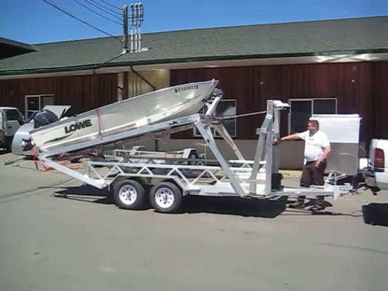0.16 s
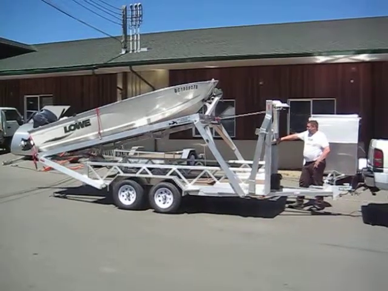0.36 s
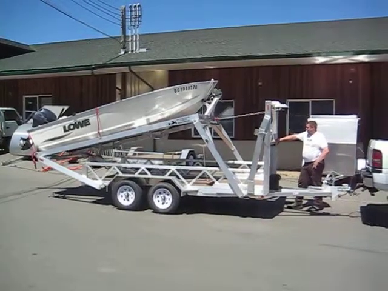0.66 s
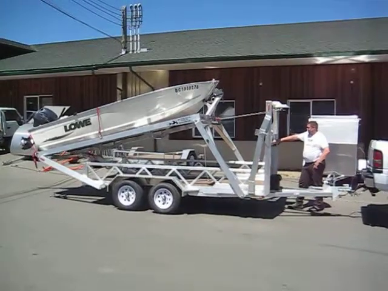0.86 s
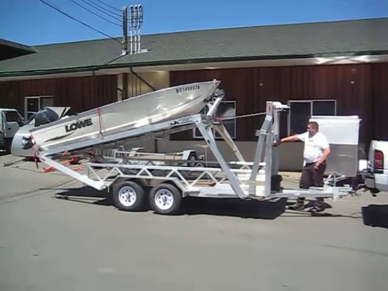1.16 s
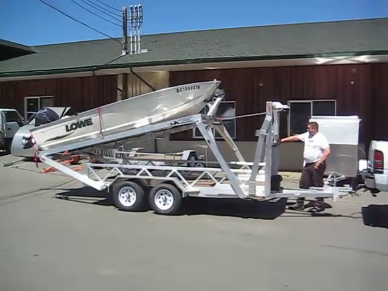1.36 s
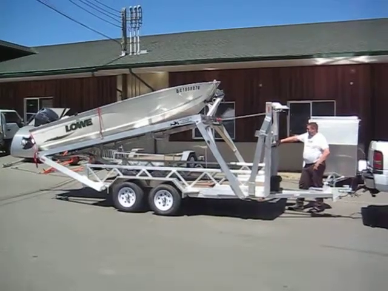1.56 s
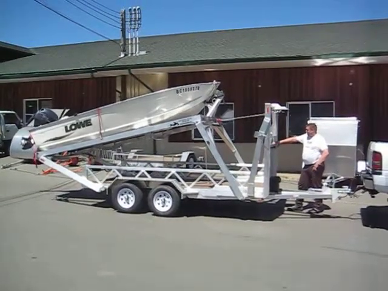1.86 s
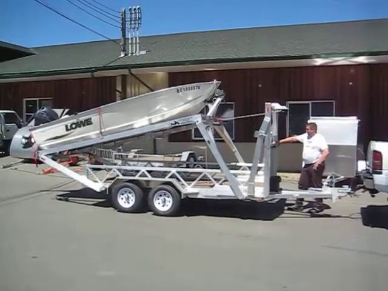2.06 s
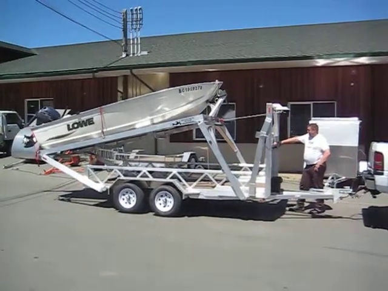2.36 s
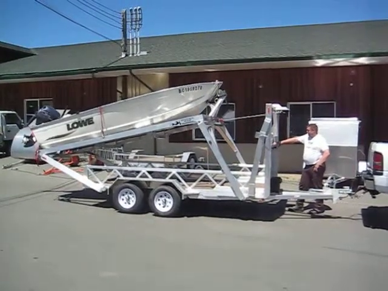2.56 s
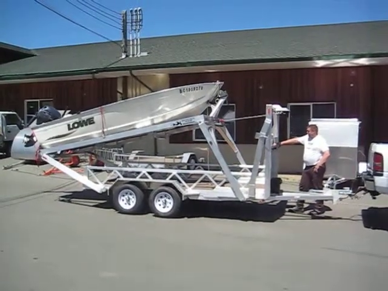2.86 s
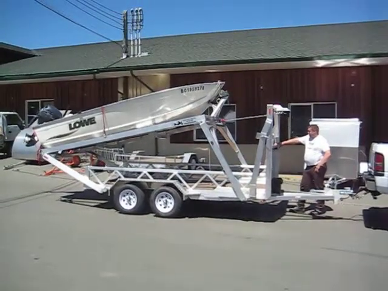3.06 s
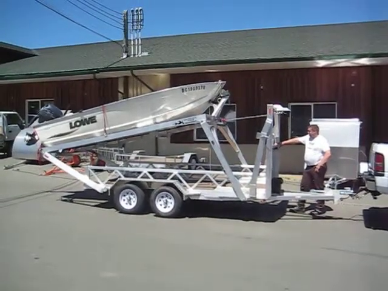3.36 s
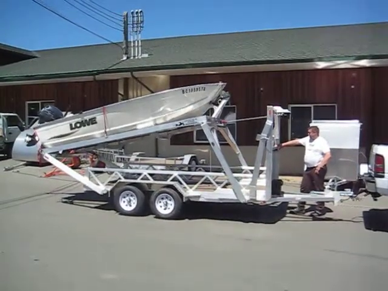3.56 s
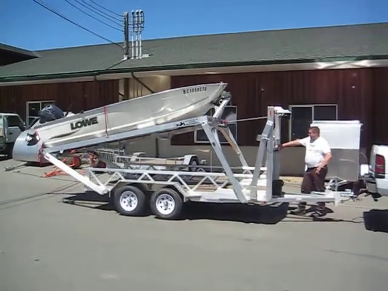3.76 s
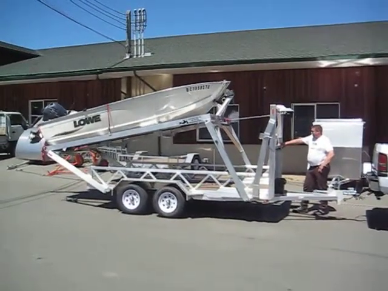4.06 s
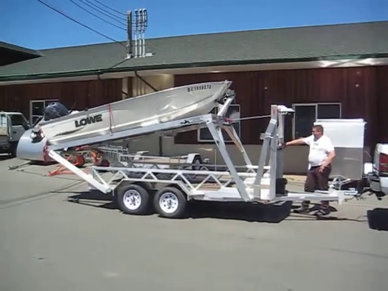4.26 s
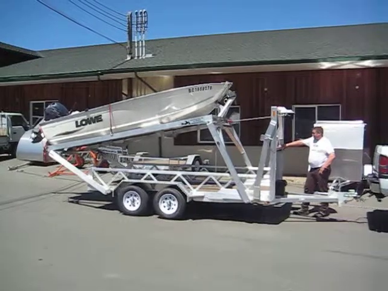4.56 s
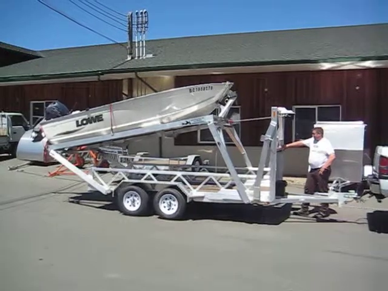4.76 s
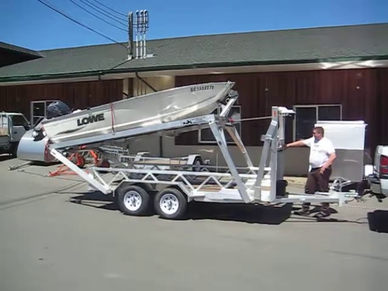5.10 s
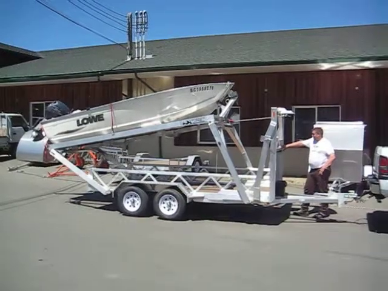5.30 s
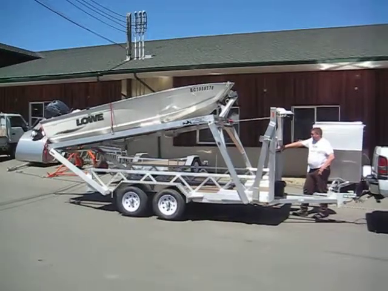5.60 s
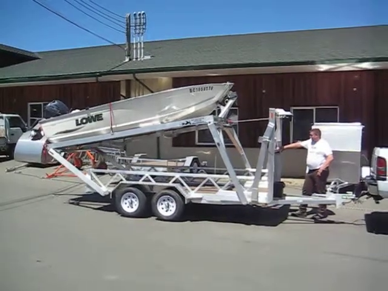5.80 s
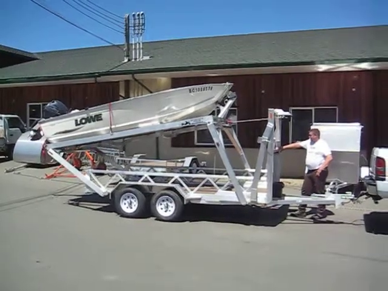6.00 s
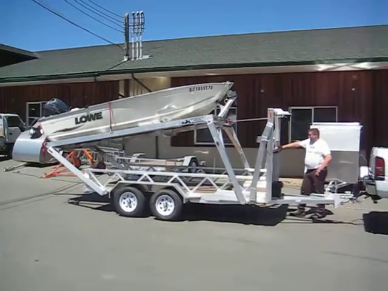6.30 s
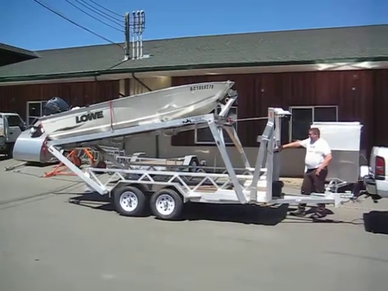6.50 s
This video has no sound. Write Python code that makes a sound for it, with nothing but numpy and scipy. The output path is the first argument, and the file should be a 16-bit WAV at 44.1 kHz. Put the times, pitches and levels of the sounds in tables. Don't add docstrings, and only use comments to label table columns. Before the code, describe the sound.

An electric winch runs continuously on a boat trailer in a paved yard, heard from several metres away on a small camera's microphone. A wavering, buzzy gear whine sits inside a loud, throbbing metallic rattle. The pitch dips slightly early on, recovers, then steps up after the middle and rises at the end. Brief scrapes, a sharp tick and soft handling thumps poke through above faint wind and distant traffic.

```python
import sys
import numpy as np
from scipy import signal
from scipy.fft import rfft, irfft
from scipy.io import wavfile
from scipy.ndimage import uniform_filter1d

SR = 44100
rng = np.random.default_rng(int(sys.argv[2]) if len(sys.argv) > 2 else 0)


def transcribe(u):
    v = np.clip(np.atleast_2d(u).T, -1, 1)
    q = np.round(v * 32767).astype(np.int16)
    wavfile.write(sys.argv[1], SR, q)


def level_to_linear(level):
    exponent = np.asarray(level, float) / 20
    return 10 ** exponent


N = 292824

# t/s, tooth rate f/Hz
SPEED = [(0.0, 383.4), (1.0, 384), (1.25, 380.3), (1.5, 374.6), (1.75, 377.9), (2.0, 382), (2.25, 385),
         (2.75, 383), (3.2, 383.3), (3.5, 381), (3.87, 384.4), (3.95, 392), (4.4, 397.9), (4.85, 394.4),
         (5.65, 392.5), (5.85, 396.9), (6.25, 405.3), (6.64, 407)]
TEETH = 48
CREEP = 1.006
MULTIPLES = (1, 2, 3, 4, 5, 6, 8, 9)
FOLLOWS = (1, 2, 3, 4, 5, 5, 5, 5)
# level over the one it follows/dB, blurred part level/dB, blur width/Hz
WHINE = [(1.4, -46, 33), (0.9, -35, 42), (-1.6, -43.5, 26), (-0.1, -39, 33), (1.54, -33.5, 40),
         (-5, -40, 61), (-5, -37.5, 58), (-10, -43, 73)]
MESH = [-44.5, -36, -42, -41.5, -34]
# f/Hz, width/Hz, lift/dB
MOUNT = [(381, 14.3, 10.5), (395.6, 3.2, 6.5), (407, 6.63, 8), (748, 10, 2), (787.4, 11, 9.5),
         (803, 52, 9.5), (1130, 10, 7.5), (1180, 16, 2), (1205, 33, 8.5), (1494, 20, 3.5), (1525, 28.7, 5),
         (1918, 60, 0.5), (1998, 4.7, 7), (2033, 20, 5)]
# t/s, level change/dB, length/s
EASES = [
    [(0.24, -2.5, 2.6), (6.33, -2.5, 0.63)],
    [(1.6, 4.5, 0.42), (4.2, -2.5, .15), (4.55, -3.5, 1), (5.95, 2.5, 0.33), (6.5, -3.5, .25)],
    [(.3, 8.5, 0.46), (4.6, -3.5, 0.67)],
    [(.6, 0, .5), (1.4, 6.5, 0.45), (6.4, -4, .7)],
    [(2.2, -0.5, 3.3), (4.45, 5, 0.53), (6.4, 0, 0.62)],
]
# throbs a turn, depth/dB, high spot/turns of that throb
TONE_THROB = [(1, 0, 0.45), (2, -1.5, 0.9), (3, .5, .75)]
WORN = [(.25, .55), (.33, .9)]
WORN_TURNS = .09
# first f/Hz, f gained per tooth rate/(Hz/Hz), drift/(Hz/s), first level/dB, drift/(dB/s)
CHATTER = [(2334, 4.5, 3, -30, -0.18), (3905, .1, 18, -28, -0.84), (4296, -.1, 11, -33, 0.35)]
# width/Hz, bead depth/dB, level offset/dB
BEADS = [(45, 1.5, -6.5), (103, 2, -0.5), (116, 0.5, -1.)]
# throbs a turn, depth/dB, high spot/turns of that throb
CHATTER_THROB = [(1, 2.1, 0.028), (2, 1.9, 1), (3, 3.5, 0.8)]
# t/s, level change/dB, length/s
FLARES = [
    [(.35, 5, .7), (1.5, -2, 0.87), (2.6, 3.5, 0.87), (4.4, 10, 0.69), (6.3, 6, .6)],
    [(0.4, 2.5, 0.66), (1.1, -1, .6), (4.7, 3.5, 0.63)],
    [(.6, -6, .5), (2.45, 3.5, 0.66), (5.0, 4.5, .7), (6.3, -18, 0.54)],
]
# throbs a turn, depth/dB, high spot/turns of that throb
RATTLE_THROB = [(1, 0.51, 0.021), (2, 0.22, 0.97), (3, 0.63, 0.78)]
SPLITS_HZ = (1750, 4560)
# worn share (0-1), throb factor, flutter/dB, knock spread/dB, share of the grating (0-1)
PARTS = [(0.48, 0.44, 1, 1.1, 0.72), (0.25, 0.38, 1, 1.45, 0.28), (0.11, 0.89, 0.79, 1.33, 0.56)]
# t/s, level over the usual scrape/dB, length/s
GRATES = [(.01, -3.5, 0.024), (.03, -1.5, 0.052), (.47, 1.5, 0.057), (.51, -9, .02), (.54, 3, 0.024),
          (.655, 8.5, 0.03), (1.05, 0, 0.14), (1.4, 6, 0.046), (1.5, -2, 0.048), (1.555, 6, 0.037),
          (3.05, 3, 0.072), (3.18, 4, 0.053), (3.44, 4, 0.06), (3.495, -6, 0.034), (3.54, 4.5, 0.088),
          (3.7, 4, 0.077), (4.5, -2.5, 0.2), (4.73, 1, 0.092), (5.51, 7, 0.02), (5.56, -5, 0.078),
          (6.32, 4, .04), (6.44, 1, 0.072), (6.47, -5, 0.031)]
# f/Hz, level per Hz/dB
RATTLE = [(230, -40.5), (340, -18), (468, -28.5), (515, -19), (800, -7), (990, -13.5), (1500, -12),
          (1800, -13.5), (1950, -6), (3000, -9.5), (4500, -14), (4900, -19.5), (9900, -35), (15230, -66.5)]
RATTLE_DB = -20.5
# f/Hz, width/Hz, level over the rattle/dB
CASING = [(305, 20, 4), (593, 18, 5), (640, 36, -10), (676, 14, 7.5), (880, 52, 4), (1150, 55, 4),
          (1503, 45, 5), (1592, 22, 5), (2034, 27, 3), (2114, 22, 3), (2156, 22, 5), (2311, 20, 8),
          (2500, 52, 3), (2649, 16, 6), (2750, 120, 2), (2897, 32, 3), (3040, 86, 4), (3526, 66, 7),
          (4440, 90, 3), (5250, 200, 2), (5604, 60, 8), (6710, 100, 2), (7558, 25, 8), (8500, 280, 3),
          (10050, 80, 2), (11000, 50, 4), (12400, 2200, 5), (13150, 200, 3)]
# f/Hz, level per Hz/dB
YARD = [(15, -24), (40, -14), (100, 0), (160, -6.5), (220, -1.5), (300, -4.5), (600, -9)]
YARD_DB = -51.5
# t/s, level over calm/dB, length/s
GUSTS = [
    (.1, 5, 0.27),
    (.36, 11, .2),
    (.55, 11, .14),
    (3.24, 13, 0.13),
    (3.52, 10, .25),
    (4.05, 7, 0.21),
    (4.5, 8.3, 0.73),
    (5.13, 12, .2),
    (6.3, 4.17, .5),
]
CALM_DB = -65
# t/s, low drone f/Hz, upper drone f/Hz
DRONES = [
    (0, 65.4, 134),
    (2.6, 63.9, 132),
    (5.6, 65.6, 130),
    (5.9, 74.4, 130),
    (6.64, 76, 130),
]
# t/s, level over usual/dB, length/s
SWELLS = [
    (0, 15, 0.13),
    (.42, 11, .18),
    (2.35, 1, .4),
    (3.52, 6, .25),
    (4.1, 11, 0.88),
    (5.01, 17, .15),
    (5.25, 14, 0.28),
    (5.65, -9, .12),
    (6.4, 9, 0.54),
]
LOW_DB, UPPER_DB, UPPER_FADE_DB = -65.5, -55.5, -1.7
# t/s, peak level/dB, f/Hz, length/s
THUMPS = [(.33, -44, 45, .05), (0.42, -39, 80, 0.028), (0.526, -43, 45, .04), (3.232, -50, 50, .04),
          (3.467, -36, 130.6, .022), (3.474, -36.5, 260, 0.023), (3.493, -42, 80, .03),
          (3.553, -32, 130, 0.01), (3.62, -44, 70, .04), (4.487, -42, 84.5, 0.045), (5.0, -42, 89.9, .03),
          (5.273, -34, 190.3, 0.012), (6.299, -37, 308, 0.05), (6.33, -37, 518, 0.06)]
# t/s, peak level/dB, ring f/Hz, t60/s
TICKS = [
    (.535, -23, 5700, 0.053),
    (1.398, -45, 6500, .03),
    (3.79, -40, 10480, .03),
    (5.711, -42, 10960, .09),
    (6.31, -39, 5430, .04),
]
# f/Hz, level/dB
WHISTLE = [(15090, -97), (15121, -87), (15150, -85), (15170, -97)]


def evened(x):
    return x / np.sqrt(np.mean(abs(x) ** 2) + 1e-20)


def columns(rows):
    s, *values = np.transpose(rows)
    return [np.interp(np.arange(N) / SR, s, v) for v in values]


def bumps(rows):
    t = np.arange(0, N + 64, 64) / SR
    db = sum(db * np.exp(-4 * ((t - s) / length) ** 2) for s, db, length in rows)
    return np.interp(np.arange(N) / SR, t, db)


def wander(width_hz):
    step, lead = 16, 4000
    z = rng.standard_normal((N // step + lead, 2)) @ [1, 1j]
    r = np.exp(-np.pi * width_hz * step / SR)
    smooth = signal.lfilter([1], [1, -2 * r, r * r], z)
    smooth = evened(smooth[lead // 2:])
    return np.interp(np.arange(N) / step, np.arange(len(smooth)), smooth)


def shaped(x, points, rings=()):
    hz = np.fft.rfftfreq(N, 1 / SR)
    f, db = np.transpose(points)
    gain = level_to_linear(np.interp(np.log(hz + 1), np.log(f + 1), db, -90, -90))
    lift = 1 + sum((level_to_linear(db) ** 2 - 1) / (1 + (2 * (hz - f) / w) ** 2) for f, w, db in rings)
    return evened(irfft(rfft(x) * gain * np.sqrt(np.maximum(lift, 0)), N))


def throb(turns, table, factor=0.75):
    return level_to_linear(factor * sum(db * np.cos(2 * np.pi * (k * turns + spot)) for k, db, spot in table))


def meshing(hz):
    grid = np.arange(300, 2200.)
    lift = 1 + sum((level_to_linear(db) ** 2 - 1) / (1 + (2 * (grid - f) / w) ** 2) ** 2 for f, w, db in MOUNT)
    lift_db = 10 * np.log10(lift)
    return {k: db + np.interp(k * hz, grid, lift_db) + bumps(rows)
            for k, db, rows in zip(MULTIPLES, MESH, EASES)}


def whine(teeth, levels_db):
    turns = CREEP * teeth / TEETH
    worn = []
    for place, depth in WORN:
        away = (turns - place + .5) % 1 - .5
        worn.append(1 - depth * np.exp(-(away / WORN_TURNS) ** 2))
    out = np.zeros(N)
    for k, leader, (db, blurred_db, blur_hz) in zip(MULTIPLES, FOLLOWS, WHINE):
        steady_power = level_to_linear(levels_db[leader] + db) ** 2 - level_to_linear(blurred_db) ** 2
        contact = np.sqrt(np.maximum(steady_power, 0)) + level_to_linear(blurred_db) * wander(blur_hz)
        if k <= len(WORN):
            wheel = throb(turns, TONE_THROB) * worn[k - 1]
        else:
            wheel = throb(teeth / TEETH, RATTLE_THROB)
        tone = np.exp(2j * np.pi * (k * teeth + rng.random()))
        out += np.sqrt(2) * wheel * (contact * tone).real
    return out


def chatter(teeth, speed):
    t = np.arange(N) / SR
    out = np.zeros(N)
    for band, (width_hz, bead_db, under_db), flares in zip(CHATTER, BEADS, FLARES):
        first_hz, follow, drift_hz, first_db, drift_db = band
        hz = first_hz + follow * (speed - speed[0]) + drift_hz * t
        beads = throb(teeth / TEETH, CHATTER_THROB) * level_to_linear(bead_db * wander(72).real)
        fuzzy = (wander(width_hz) * np.exp(2j * np.pi * np.cumsum(hz) / SR)).real
        level_db = first_db + drift_db * t + bumps(flares) + under_db
        out += level_to_linear(level_db) * evened(beads * fuzzy)
    return out


def panels(x, patchy_db=2.5):
    z = signal.stft(x, nperseg=2048, noverlap=1536)[2]
    patches = rng.standard_normal(z.shape[::-1]).T
    patches = evened(uniform_filter1d(patches, size=48, axis=1))
    patchy = signal.istft(z * level_to_linear(patchy_db * patches), nperseg=2048, noverlap=1536)[1]
    return evened(patchy[:N])


def rattle(teeth):
    marks = rng.standard_normal(TEETH * 128)
    repeat = marks[(teeth * 128).astype(int) % len(marks)]
    fresh = rng.standard_normal(N)
    scrape_db = bumps(GRATES)
    scrape_db = scrape_db - scrape_db.mean()
    part = np.searchsorted(SPLITS_HZ, np.fft.rfftfreq(N, 1 / SR))
    joined = 0
    for k, (worn, factor, flutter_db, knock_db, share) in enumerate(PARTS):
        surface = np.sqrt(1 - worn) * fresh + np.sqrt(worn) * repeat
        drive = surface * throb(teeth / TEETH, RATTLE_THROB, factor)
        shake_db = flutter_db * wander(16).real + knock_db * wander(190).real + share * scrape_db
        joined = joined + rfft(evened(drive * level_to_linear(shake_db))) * (part == k)
    return level_to_linear(RATTLE_DB) * panels(shaped(irfft(joined, N), RATTLE, CASING))


def wind():
    rumble = shaped(rng.standard_normal(N), [(15, -10), (35, 2), (55, -1), (130, -26)])
    return level_to_linear(CALM_DB + bumps(GUSTS)) * rumble


def traffic():
    low_db = LOW_DB + bumps(SWELLS)
    upper_db = UPPER_DB + UPPER_FADE_DB * np.arange(N) / SR
    out = np.zeros(N)
    for hz, db in zip(columns(DRONES), (low_db, upper_db)):
        fuzz = 0.94 + 0.24 * wander(17)
        out += level_to_linear(db + 2.5) * (fuzz * np.exp(2j * np.pi * np.cumsum(hz) / SR)).real
    return out


def yard():
    return wind() + traffic() + level_to_linear(YARD_DB) * shaped(rng.standard_normal(N), YARD)


def knocks():
    out = np.zeros(N + SR)
    t = np.arange(SR // 5) / SR
    lag = t - t.mean()
    for s, db, hz, length in THUMPS:
        push = np.exp(-8 * (lag / length) ** 2) * np.sin(2 * np.pi * hz * lag)
        out[round((s - t.mean()) * SR):][:len(t)] += level_to_linear(db) * push
    for s, db, hz, t60 in TICKS:
        band = signal.butter(4, [.72 * hz, 0.97 * hz], "band", fs=SR, output="sos")
        crack = 4.0 * signal.sosfilt(band, rng.standard_normal(len(t)) * level_to_linear(-60 * t / .04))
        ring = np.minimum(t / .001, 1) * level_to_linear(-60 * t / t60) * np.sin(2 * np.pi * hz * t)
        out[round(s * SR):][:len(t)] += level_to_linear(db) * (ring + crack)
    return out[:N]


def scene():
    hz, = columns(SPEED)
    teeth = np.cumsum(hz + .8 * wander(9).real) / SR
    winch = whine(teeth, meshing(hz)) + chatter(teeth, hz) + rattle(teeth)
    return (winch + yard() + knocks())[None]


def low_pass(x):
    return signal.sosfilt(signal.butter(12, 15640, fs=SR, output="sos"), x)


def record(dry):
    t = np.arange(N) / SR
    whistle = sum(level_to_linear(db) * np.sqrt(2) * np.sin(2 * np.pi * hz * t) for hz, db in WHISTLE)
    return low_pass(dry + whistle)


dry = scene()
out = record(dry)
transcribe(out)
```